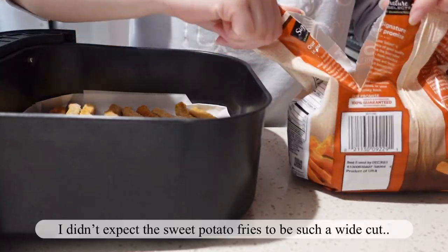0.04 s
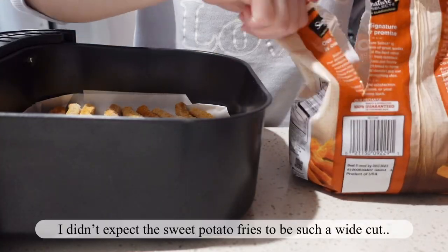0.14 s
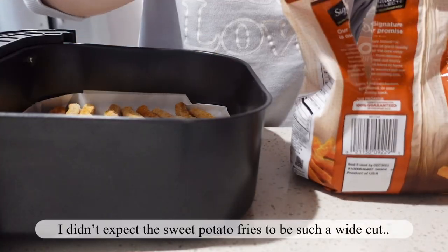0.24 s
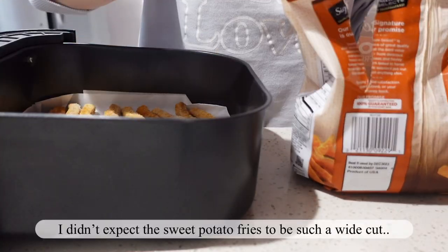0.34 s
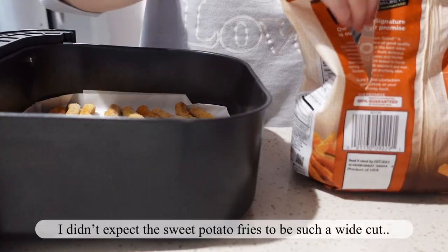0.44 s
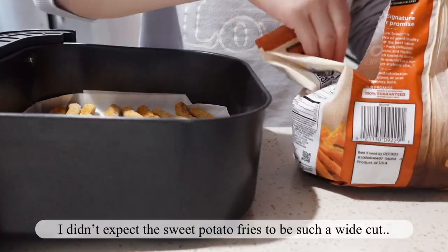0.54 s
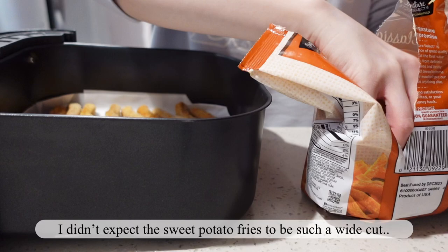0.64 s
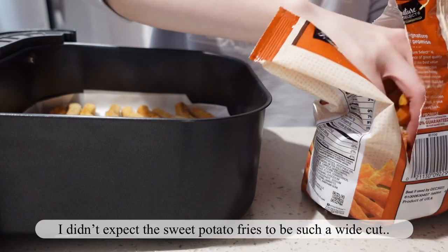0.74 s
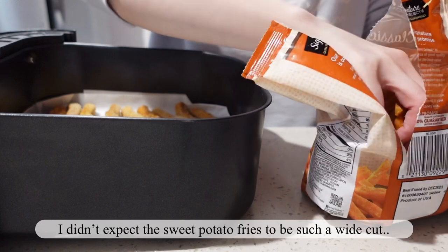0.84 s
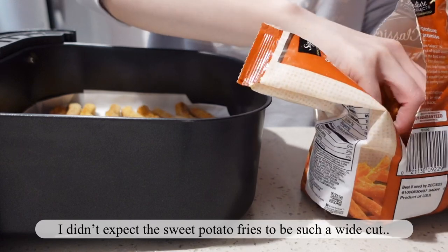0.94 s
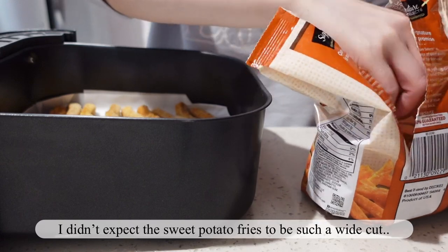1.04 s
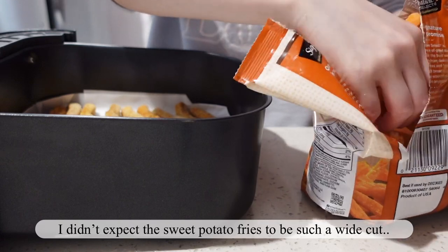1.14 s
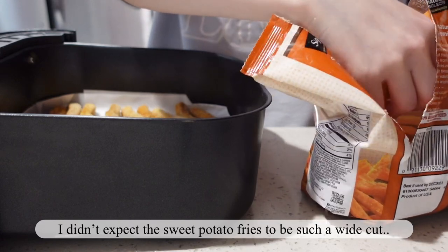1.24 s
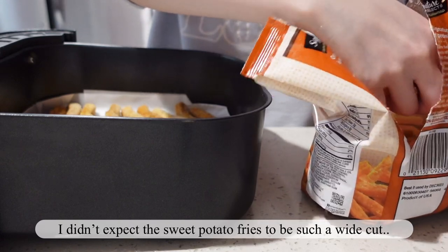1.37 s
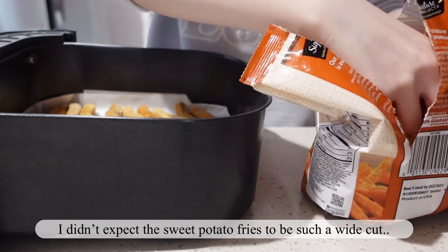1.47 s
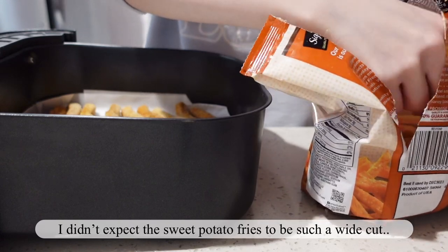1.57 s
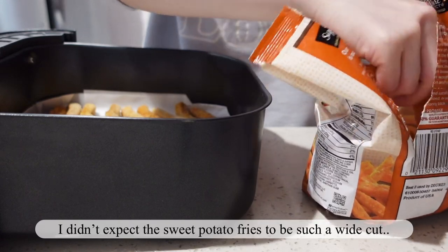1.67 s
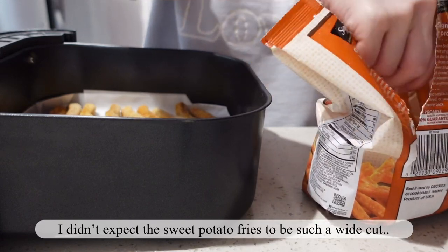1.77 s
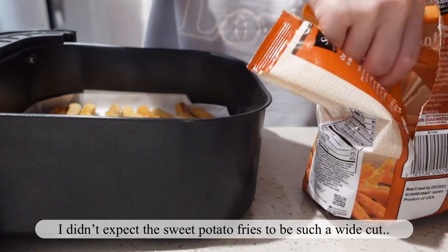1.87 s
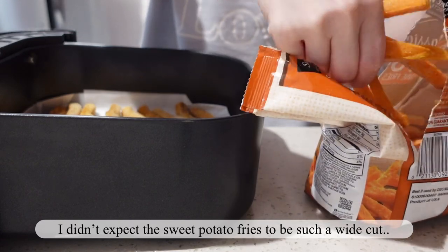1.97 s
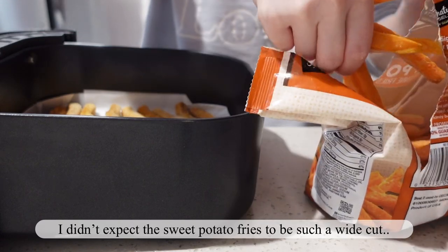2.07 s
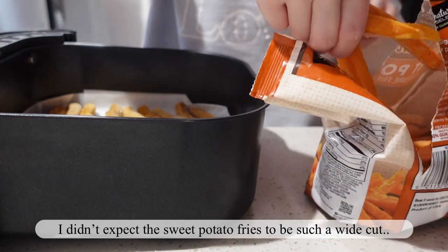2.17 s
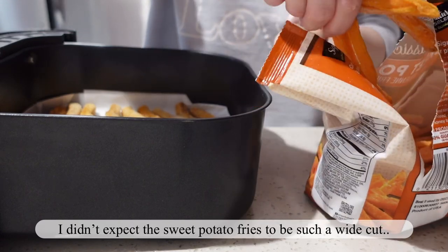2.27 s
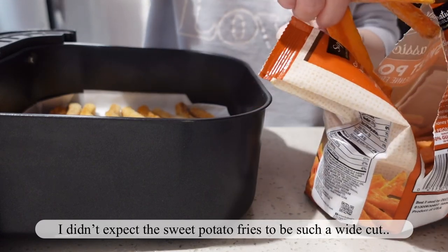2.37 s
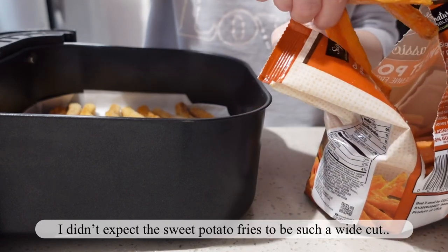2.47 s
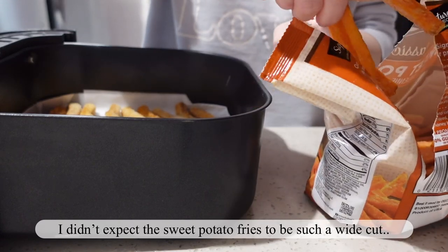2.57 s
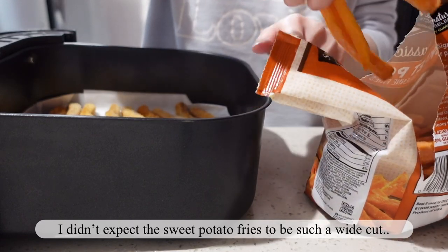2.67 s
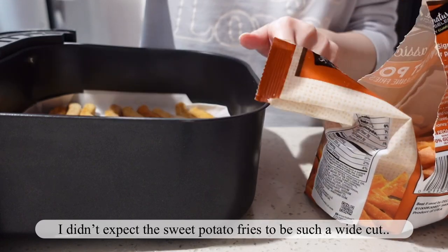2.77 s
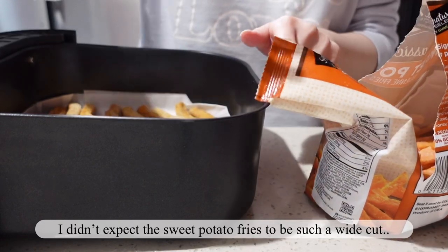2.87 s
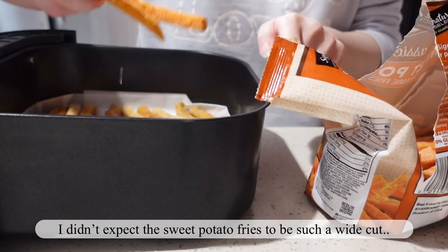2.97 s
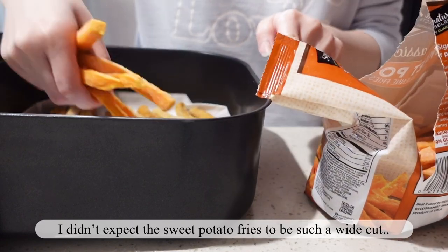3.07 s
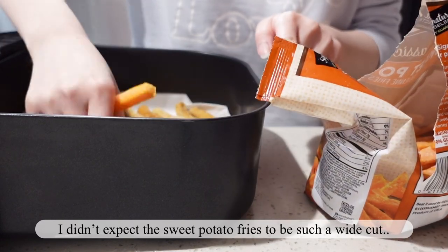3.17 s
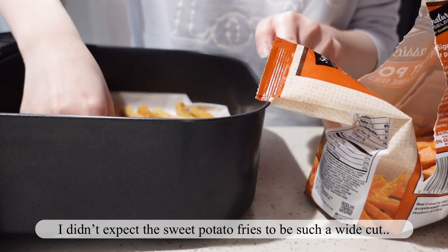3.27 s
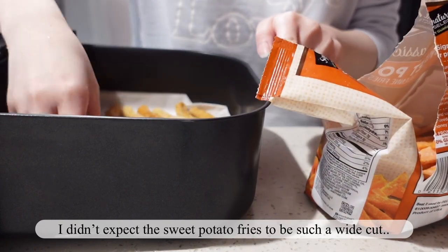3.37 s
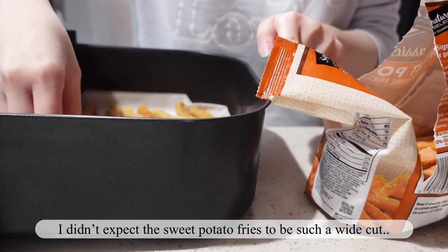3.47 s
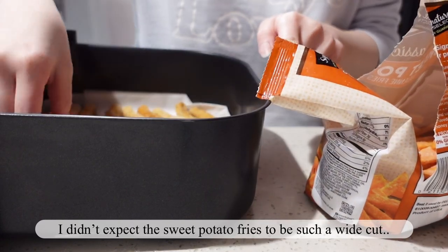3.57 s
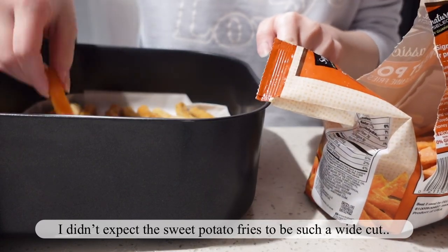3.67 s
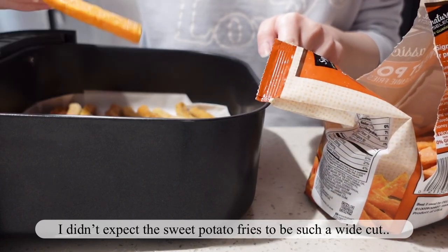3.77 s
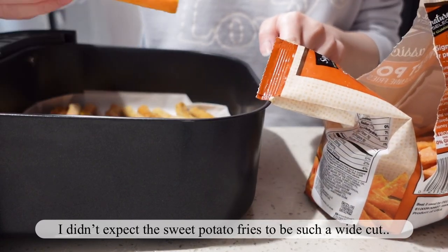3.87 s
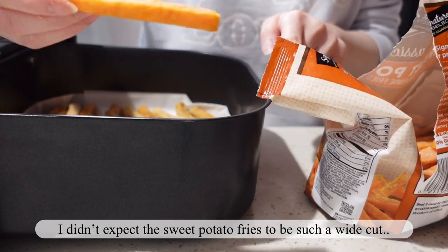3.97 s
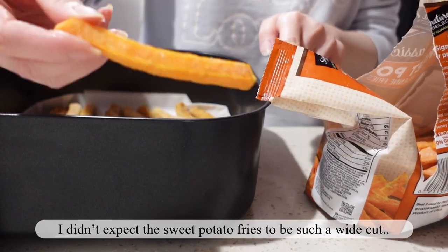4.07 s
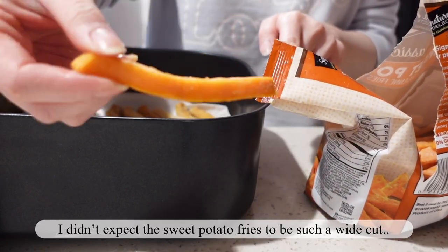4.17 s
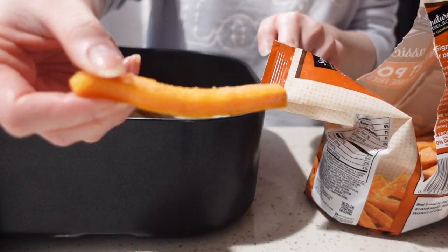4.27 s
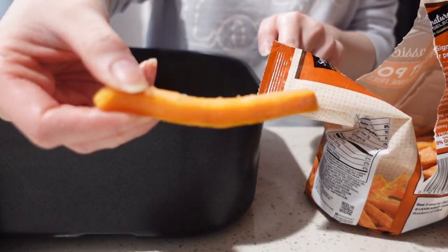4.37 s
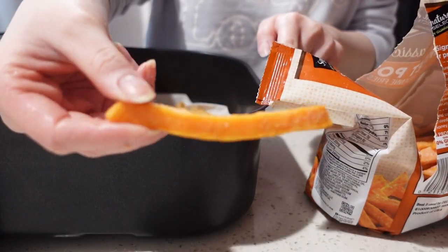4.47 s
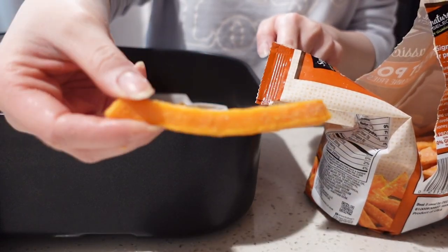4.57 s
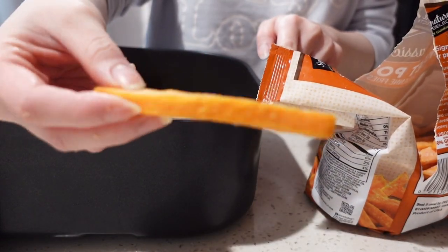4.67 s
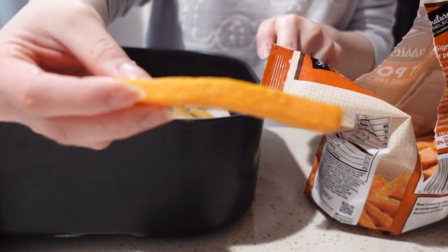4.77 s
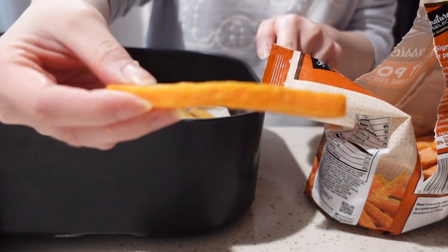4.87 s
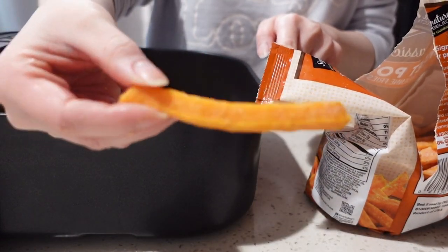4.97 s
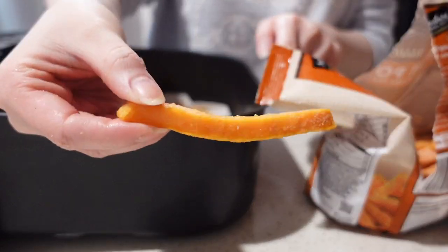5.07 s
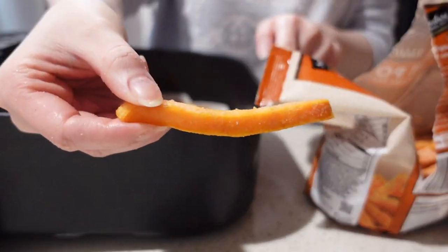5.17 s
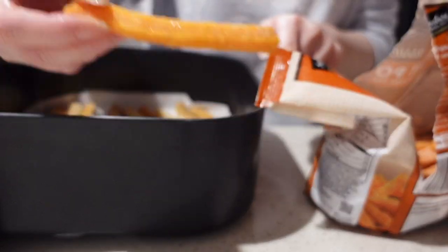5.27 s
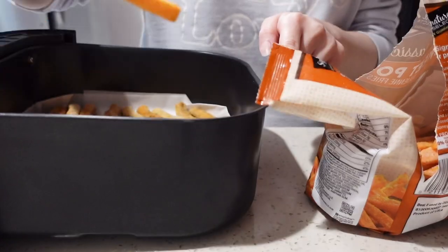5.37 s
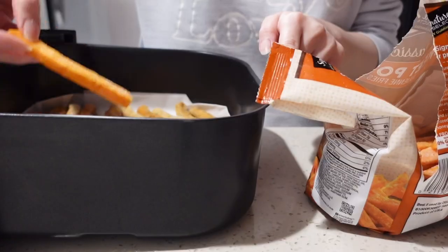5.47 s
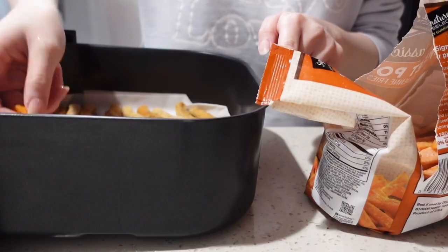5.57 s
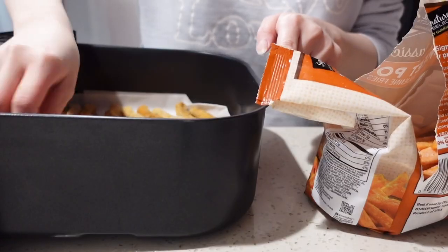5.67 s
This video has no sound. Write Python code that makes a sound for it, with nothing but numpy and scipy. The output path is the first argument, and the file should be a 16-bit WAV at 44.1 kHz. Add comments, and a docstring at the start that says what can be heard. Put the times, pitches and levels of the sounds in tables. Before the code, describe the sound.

From the start until about 2.1 seconds, a hand rummages in a stiff plastic bag close by. The plastic crackles in uneven surges with many sharp snaps, while frozen fries rub and knock dully inside and the bag bumps softly on the counter. From 2 to 2.7 seconds, fries scrape thinly along the torn edge, with a few fading ticks. Between 3 and 3.5 seconds, baking paper rustles and fries land with light, hollow knocks in a basket. Another soft touch and rustle comes at 4 seconds. It then goes quiet, apart from a few very faint, distant blips between 5 and 5.5 seconds. Near 5.7 seconds, a fry lands with a crisp paper crack and a brief hollow knock. The kitchen sounds small and hard, with very short reverberation and a low, steady hiss throughout.

```python
"""Frozen fries, bag to basket.

A hand digs in a stiff plastic bag on a kitchen counter: creases buckle and snap, fries knock together,
the bag bumps. Fries scrape out along the torn edge, then land on baking paper in a hollow basket.
A small hard room answers. Faint far-off blips near the end; low hiss throughout."""
import sys
import numpy as np
from scipy import signal
from scipy.fft import rfft, irfft, next_fast_len
from scipy.io import wavfile

SR = 44100
rng = np.random.default_rng(int(sys.argv[2]) if len(sys.argv) > 2 else 0)


def output_pcm(signal):
    """Save a mono or channel-first signal as 16-bit PCM at the path in sys.argv[1].

    Samples are clipped to [-1, 1] before scaling.
    """
    pcm = np.clip(np.atleast_2d(signal).T, -1, 1) * 32767
    wavfile.write(sys.argv[1], SR, np.round(pcm).astype(np.int16))


N = 252693

# Hand rummaging in the bag: (time [s], film crackle [dB], tumbling fries [dB])
RUMMAGE_LEVELS = [(0.0, -27.5, -28.5), (0.05, -46.5, -41.5), (0.14, -38, -37.5), (0.31, -48, -55.5),
                  (0.52, -59, -47), (0.65, -45.5, -41.5), (0.71, -37.5, -38), (0.86, -41, -45),
                  (1.14, -49, -45), (1.28, -40, -40.5), (1.44, -40.5, -42), (1.67, -42.5, -46.5),
                  (1.87, -42.5, -48), (1.99, -45.5, -36.5), (2.12, -57, -57.5), (2.59, -62.5, -65.5),
                  (2.76, -62, -70.5), (2.9, -87, -79)]
# Film crackle spectrum: (frequency [Hz], density [dB])
FILM_SPECTRUM = [(1500, -25), (2700, -5), (4500, 0), (7000, -2), (11000, -3), (15300, -6), (16500, -25)]
# Resonances of the heap of fries: (frequency [Hz], width [Hz], gain [dB])
HEAP_MODES = [(208, 30, -2.5), (299.3, 67, 2.5), (599.5, 300, -9), (1060, 39, 2.5)]
# Hiss spectrum: (frequency [Hz], density [dB])
HISS_SPECTRUM = [(24, -84.5), (40, -39), (228, -9.5), (265, -8), (377, -3), (865, -7.5), (1060, -8.5),
                 (1260, -6), (1800, -9.5), (2250, -10), (14500, -23), (16500, -29.5)]
# Room decay: (frequency [Hz], T60 [s])
ROOM_DECAY = [(200, 0.16), (1000, 0.13), (4000, 0.1), (14000, 0.053)]
# Loudest creases buckling: (time [s], level [dB], ring [Hz], relative body [dB], relative treble [dB])
FILM_SNAPS = [(0.0153, -4.5, 4500, -13.5, -16.5), (0.027, -3, 4400, -23, -18.5),
              (0.0353, -6.5, 5510, -17, -7.5), (0.0544, -7, 6760, -22, -17),
              (0.067, -15.5, 7100, -17, -6.5), (0.0825, 2, 8240, -27.5, -14.5),
              (0.0877, -12, 8100, -24, -9), (0.0953, -12.5, 3300, -29, -7), (0.1362, -6, 5560, -27, -16),
              (0.1433, -24, 7900, -17, -5), (0.1486, 3, 4900, -28, -13), (0.1642, -1.5, 5880, -15, -11),
              (0.2064, -14.5, 4100, -9, -26), (0.2326, -12.5, 4560, -13, -20), (0.2411, -8, 5550, -17, -18),
              (0.2471, -7, 2800, -9.5, -14.5), (0.3011, -5.5, 5740, -21, -13),
              (0.3168, -5, 3660, -14.5, -11.5), (0.3531, -16.5, 2940, -16, -23),
              (0.4568, -20, 8350, -23, -13), (0.4648, -27, 5940, -12, -3.5),
              (0.4776, -5.5, 5800, -29, -8.5), (0.4913, -10.5, 8200, -29.5, -10),
              (0.4972, 3.5, 5360, -21, -18), (0.5138, -6.5, 5700, -18.5, -12),
              (0.5321, 5, 7230, -18.5, -15.5), (0.5454, -8.5, 5300, -14.5, -5.5),
              (0.5561, -5.5, 5800, -19.5, -11.5), (0.56, -5.5, 5030, -19, -11),
              (0.5728, -9, 4900, -19, -10), (0.5782, -1.5, 4290, -14, -16.5),
              (0.5922, -5, 3870, -16.5, -14.5), (0.6207, -8, 6940, -19, -19.5),
              (0.624, -5.5, 6200, -18.5, -11.5), (0.6279, -2.5, 6970, -20, -15),
              (0.6461, -7, 5490, -11.5, -20.5), (0.6629, -18, 4310, -18, -15),
              (0.7368, -2, 5450, -19, -12.5), (0.7539, 2, 4280, -16.5, -10.5), (0.76, -3, 6190, -19, -14.5),
              (0.8097, -14, 3560, -8.5, -23), (0.8232, -9, 4300, -18.5, -21),
              (0.8394, -14, 5070, -25.5, -16), (0.8931, -13, 5460, -12, -24),
              (0.9006, -4, 5300, -11.5, -16), (0.9212, -9, 3110, -16, -30), (0.9284, -20, 3440, -10.5, -21),
              (0.9647, -25, 6140, -15.5, -14), (1.0009, -11, 4440, -21, -17.5),
              (1.036, -22.5, 4600, -21, -14), (1.0656, -13, 6020, -12, -21), (1.0938, -6.5, 5450, -23, -17),
              (1.0984, -17, 4760, -10, -5.5), (1.1243, 1.5, 7060, -16, -20.5),
              (1.1461, -11, 4220, -12.5, -25), (1.2136, -10, 4100, -24, -16.5),
              (1.2394, -9.5, 6400, -16.5, -18), (1.2534, -12.5, 3640, -10.5, -20),
              (1.263, -22, 7070, -17, -10.5), (1.286, -10.5, 6400, -14, -14),
              (1.302, -19.5, 5690, -9, -0.5), (1.3231, 0.5, 5730, -20.5, -9.5), (1.3979, 1, 4410, -29, -15),
              (1.405, -3.5, 6100, -17.5, -12), (1.4124, -3, 4480, -22.5, -19), (1.422, 2, 5700, -20.5, -19),
              (1.4441, -7, 3300, -18, -12.5), (1.4663, -2, 5800, -16.5, -10),
              (1.4857, -19.5, 4500, -7, -6.5), (1.491, -8.5, 4400, -16.5, -5.5),
              (1.5764, 0.5, 5280, -51.5, -16.5), (1.602, -11.5, 6450, -12, -7.5),
              (1.6114, -1.5, 4620, -27, -13.5), (1.6169, -6.5, 7630, -17.5, -8.5),
              (1.6248, -7.5, 4170, -17, -16), (1.6394, -10.5, 8300, -17.5, -13.5),
              (1.6649, -14.5, 4100, -11, -19), (1.724, -11.5, 4200, -12, -13.5),
              (1.7823, -23.5, 4370, -7, -17), (1.8087, -17.5, 3770, -14, -26),
              (1.8149, -18.5, 4170, -11, -19), (1.8632, -9, 2850, -14.5, -13),
              (1.869, -6.5, 7000, -15.5, -8), (1.923, -14, 3040, -29, -7), (1.9372, -9, 4200, -15, -20),
              (1.9467, -22, 4390, -14, -10), (1.9538, -12, 7360, -27, -11.5),
              (1.9731, -0.5, 2900, -10.5, -24.5), (1.9884, -24, 2790, -9, -22),
              (2.0346, -14, 4400, -16, -13.5), (2.0458, -15.5, 4370, -14, -16),
              (2.0861, -13.5, 4700, -24, -22), (2.114, -20, 4320, -21, -17),
              (2.123, -19.5, 4520, -16.5, -12), (2.2268, -28, 8450, -48, -4.5),
              (2.3167, -29, 4530, -37, -7), (2.3299, -24.5, 4570, -18, -6.5),
              (2.418, -28.5, 7620, -42, -8.5), (2.5321, -22, 3840, -22, -13),
              (2.6392, -27, 4590, -38, -8.5), (2.7287, -47, 4520, -21, -14)]
# Fries colliding in the bag: (time [s], level [dB], pitch [Hz])
FRY_KNOCKS = [(0.017, -28.5, 497), (0.036, -29, 764), (0.067, -26, 670), (0.087, -33.5, 345),
              (0.205, -32, 748), (0.242, -23, 834), (0.315, -28.5, 876), (0.477, -28.5, 700),
              (0.531, -13.5, 646), (0.556, -22.5, 674), (0.641, -17.5, 580), (0.68, -28, 331),
              (0.714, -23.5, 720), (0.737, -29.5, 336), (0.759, -30.5, 686), (0.809, -25, 630),
              (0.877, -31, 860), (0.901, -27, 660), (0.924, -25, 460), (1.066, -21.5, 280),
              (1.079, -24.5, 310), (1.123, -13, 673), (1.157, -24, 880), (1.211, -27.5, 463),
              (1.249, -27, 890), (1.286, -30, 516), (1.304, -32, 630), (1.408, -22.5, 580),
              (1.443, -32, 595), (1.465, -20, 627), (1.487, -26, 650), (1.612, -21.5, 624),
              (1.625, -26, 323), (1.721, -28, 373), (1.78, -34, 888), (1.864, -35, 680), (1.924, -38, 620),
              (1.953, -48, 686), (1.971, -17.5, 884), (2.034, -26, 328), (2.333, -38, 503),
              (2.534, -33, 249), (2.673, -39.5, 590)]
# Fries scraping along the torn edge: (peak time [s], level [dB])
EDGE_SCRAPES = [(2.06, -45), (2.088, -44.5), (2.122, -49), (2.225, -60), (2.3, -57), (2.328, -59),
                (2.44, -63), (2.525, -57)]
# Resonances of the taut edge: (frequency [Hz], width [Hz], gain [dB])
EDGE_MODES = [(4446, 130, 1), (5070, 170, -4), (6400, 200, -9)]
# Paper rustling under the hand: (peak time [s], level [dB])
PAPER_RUSTLES = [(3.05, -68.5), (3.215, -40), (3.39, -47.5), (4.045, -50), (5.7, -48.5)]
# Touches on the paper: (time [s], level [dB], ring [Hz], relative body [dB], relative treble [dB])
PAPER_TOUCHES = [(3.035, -26.5, 5340, -43, -13), (3.1544, -34, 3670, -19, -13.5),
                 (3.1764, -27, 3390, -18, -24), (3.196, -20, 3800, -36, -22),
                 (3.2087, -9.5, 6520, -27, -12), (3.2269, -14, 5350, -17, -18),
                 (3.2407, -7, 5240, -22, -13.5), (3.289, -24, 5130, -27, -15),
                 (3.3237, -25.5, 8000, -27, -17), (3.3722, -11.5, 7860, -25, -16.5),
                 (3.3808, -19, 3620, -21, -19), (3.392, -18, 3510, -16, -13), (3.4196, -14, 3740, -22, -17),
                 (3.4482, -40, 3420, -24, -12), (4.0025, -22.5, 5250, -20, -18),
                 (4.007, -21, 3750, -23, -15), (4.0121, -23, 3340, -16, -20),
                 (4.0348, -14.5, 4120, -24, -22), (4.0487, -20, 4240, -27, -24),
                 (4.0614, -39, 4445, -4, -21), (5.6223, -24.5, 4670, -23.5, -20),
                 (5.679, -2, 4650, -24.5, -7.5)]
# Fries landing or settling on the basket floor: (time [s], level [dB], pitch [Hz])
FRY_LANDINGS = [(3.176, -54, 735), (3.209, -45, 740), (3.229, -41, 790), (3.241, -31.5, 710),
                (3.264, -40, 416), (3.374, -36.5, 495), (3.392, -37.5, 402), (3.418, -45, 617),
                (4.007, -42.5, 433), (4.034, -49, 770), (4.048, -39, 200), (5.62, -42.5, 732),
                (5.676, -27, 700)]
# Resonances of the hollow basket: (frequency [Hz], width [Hz], gain [dB])
BASKET_MODES = [(189, 47, 1.5), (463, 19, 15), (655, 47, 2.5), (1088, 30, 8.5), (2920, 71, 11)]
# Far-off blips: (time [s], level [dB], pitch [Hz], half-width [s])
FAR_BLIPS = [(5.048, -56, 1190, 0.024), (5.365, -57.5, 1110, 0.021), (5.44, -63, 1320, 0.039),
             (5.14, -69.5, 1550, 0.07)]


def amp(db):
    """Decibels to gain."""
    return 10 ** (np.asarray(db) / 20)


def unit(x):
    """Scale to rms 1."""
    return x / np.sqrt(np.mean(x ** 2) + 1e-20)


def along(points, hz):
    """Interpolate (Hz, value) points on a log axis."""
    point_hz, values = np.transpose(points)
    return np.interp(np.log(hz + 1), np.log(point_hz + 1), values)


def filtered(x, response):
    """Apply a complex frequency response."""
    size = next_fast_len(N + SR // 2)
    return irfft(rfft(x, size) * response(np.fft.rfftfreq(size, 1 / SR)), size)[..., :N]


def shaped(x, spectrum):
    """Apply a (Hz, dB) curve."""
    return filtered(x, lambda hz: amp(along(spectrum, hz)))


def band(x, lo_hz, hi_hz):
    """Band-pass; white noise keeps its rms."""
    sos = signal.butter(2, [lo_hz, hi_hz], "bandpass", fs=SR, output="sos")
    return signal.sosfilt(sos, x) * np.sqrt(SR / 2 / (hi_hz - lo_hz))


def resonant(x, modes):
    """Parallel resonances of alternating sign."""
    return filtered(x, lambda hz: sum(
        (-1) ** k * amp(db) * 1j * hz * width_hz / (mode_hz ** 2 - hz ** 2 + 1j * hz * width_hz)
        for k, (mode_hz, width_hz, db) in enumerate(modes)))


def sides(pan_db):
    """Stereo gains, left over right by pan_db."""
    return amp(np.array([[.5], [-.5]]) * pan_db)


def stereo(mid, side):
    """Mid and side to left and right."""
    return np.array([mid + side, mid - side])


def swells(peaks, rise_db_per_s, fall_db_per_s):
    """Gain ramping up to and down from each (s, dB) peak."""
    t = np.arange(N) / SR
    return sum(amp(db - np.where(t < s, rise_db_per_s * (s - t), fall_db_per_s * (t - s)))
               for s, db in peaks)


def ticks(rate_hz, spread_db, t60_s):
    """Random noise bursts of very uneven size, rms 1."""
    when, size = rng.random((2, int(rate_hz * N / SR)))
    train = np.bincount((when * N).astype(int), amp(-spread_db * np.log(size + 0.0037)), N)
    tail = amp(-60 * np.arange(SR // 20) / SR / t60_s)
    return unit(signal.fftconvolve(train, tail)[:N] * rng.standard_normal(N))


def textures():
    """Crackle of tiny creases and rubbing of fries, each as (mid, side)."""
    creases = np.array([ticks(2000, 2.2, 0.004), 0.4 * ticks(2000, 2.2, 0.004)])
    rubs = np.array([ticks(230, 3.7, 0.033), 0.11 * ticks(250, 3, 0.025)])
    crackle = unit(shaped(creases, FILM_SPECTRUM))
    heap = unit(resonant(rubs, HEAP_MODES))
    return crackle, unit(heap + 1.7 * unit(band(rubs, 170, 2600)))


def rummage_gains():
    """Film and fries envelopes of the moving hand."""
    s, film_db, fries_db = np.transpose(RUMMAGE_LEVELS)
    return [amp(np.interp(np.arange(N) / SR, s, db, right=-120)) for db in (film_db, fries_db)]


def rummage(crackle, rubbing):
    """Film crackles and fries rub while the hand moves."""
    film_gain, fries_gain = rummage_gains()
    return stereo(*(film_gain * crackle + fries_gain * rubbing))


def bag_bumps():
    """The bag thuds softly on the counter while the fries tumble."""
    _, fries_gain = rummage_gains()
    bumps = np.array([ticks(40, 3, 0.08), 0.45 * ticks(40, 3, 0.0803)])
    thuds = unit(filtered(bumps, lambda hz: 1 / (1 + (hz / 110) ** 4)))
    return stereo(*(amp(-11) * fries_gain * thuds))


def hiss():
    """Room tone and microphone noise, partly shared by both sides."""
    mid, side = shaped(rng.standard_normal((2, N)), HISS_SPECTRUM)
    return amp(-61) * np.array([mid + 0.77 * side, mid - 0.6 * side]) / np.std(mid)


def kitchen(x):
    """Short, mostly centred reverb; treble dies first."""
    hz, t, spectra = signal.stft(rng.standard_normal((2, SR // 2)), SR, nperseg=256)
    decay = amp(-60 * t / along(ROOM_DECAY, hz)[:, None])
    tail = signal.istft(spectra * decay, SR, nperseg=256)[1]
    tail = np.pad(tail / np.linalg.norm(tail[0]), ((0, 0), (150, 0)))  # 3.4 ms pre-delay
    mid, side = signal.fftconvolve(x[None], tail, axes=1)[:, :N]
    return stereo(mid, shaped(side, [(300, -12), (2000, -10), (10000, -14)]))


def sheet_cracks(events, rise_s, spike_db, ring_db, shiver_db, shiver_t60_s, base_t60_s,
                 pan_db, pan_scatter_db):
    """Each event: a spike, a crack ringing at its own pitch, a weaker shiver of the sheet."""
    spike_t60_s, shorter_octaves_per_db = 0.0015, 0.0535
    layers, t = np.zeros((4, 2, N + SR)), np.arange(SR // 10) / SR
    rise = 1 - np.exp(-(t / rise_s) ** 2)
    spike = amp(np.maximum(-60 * t / spike_t60_s, -200))
    shiver = rise * amp(shiver_db - 60 * t / shiver_t60_s)
    pan_share = np.array([1, 0.67, 1, 0.3])[:, None, None]  # long waves differ less between sides
    for s, db, ring_hz, body_db, treble_db in events:
        t60_s = base_t60_s / 2 ** (shorter_octaves_per_db * db)  # louder cracks die sooner
        crack = rise * (spike + amp(-spike_db - 60 * t / t60_s))
        sheet = crack + shiver
        noise = rng.standard_normal((4, len(t)))
        energy = np.sum((sheet * noise[:3]) ** 2, 1, keepdims=True)
        noise[:3] /= np.sqrt(energy / np.sum(sheet ** 2))  # the blow sets the energy
        tone = np.sin(2 * np.pi * ring_hz * t + 0.25 * np.cumsum(noise[3]))  # blurred pitch
        parts = np.array([sheet * noise[0],
                          amp(ring_db) * crack * tone,
                          amp(treble_db) * (0.26 * sheet + 0.9 * crack) * noise[1],
                          amp(body_db) * sheet * noise[2]])
        pan = sides(pan_db + pan_scatter_db * rng.standard_normal()) ** pan_share
        start = round(s * SR)
        layers[..., start:start + len(t)] += amp(db) * parts[:, None] * pan
    snap, ring, treble, body = layers[..., :N] + 1e-12
    return (amp(-6) * band(snap, 2900, 7200) + ring
            + amp(11) * band(treble, 7500, 14000) + amp(7.5) * band(body, 780, 2400))


def lesser_creases(count=90, spread_db=8.5):
    """Random extra snap rows, as strong as the hand is busy."""
    s, film_db, _ = np.transpose(RUMMAGE_LEVELS)
    when, size, pitch, body, treble = rng.random((count, 5)).T
    time_s = s[-1] * when
    level_db = np.interp(time_s, s, film_db) - spread_db * np.log(size + 0.05)
    return list(zip(time_s, level_db, 3200 * 2 ** (1.3 * pitch), -24 + 12 * body, -20 + 11 * treble))


def film_snaps():
    """Creases in the stiff film buckle with sharp cracks."""
    return sheet_cracks(list(FILM_SNAPS) + lesser_creases(), rise_s=0.0005, spike_db=9, ring_db=1,
                        shiver_db=-20.5, shiver_t60_s=0.073, base_t60_s=0.0085,
                        pan_db=-1.85, pan_scatter_db=3)


def fry_knocks(events, t60_s):
    """Frozen fries strike: dull thuds of blurred pitch."""
    out, t = np.full(N + SR, 1e-12), np.arange(SR // 8) / SR
    rise = 1 - np.exp(-t / 0.00049)
    for s, db, hz in events:
        tone = np.sin(2 * np.pi * hz * t + 0.14 * np.cumsum(rng.standard_normal(len(t))))
        out[round(s * SR):][:len(t)] += rise * amp(db - 60 * t / t60_s) * tone
    return amp(-13.5) * band(out[:N], 170, 870)


def edge_scrape():
    """Rapid slips make the taut bag edge sing and the film hiss."""
    gain = swells(EDGE_SCRAPES, rise_db_per_s=240, fall_db_per_s=480)
    slips = ticks(rate_hz=1500, spread_db=1.8, t60_s=0.005)
    singing = unit(resonant(slips, EDGE_MODES))
    film_hiss = unit(shaped(slips, FILM_SPECTRUM))
    return gain * (singing + amp(3.5) * film_hiss) * sides(-1.5)


def paper_rustle(crackle, rubbing):
    """Paper rustles as the hand works in the basket."""
    gain = swells(PAPER_RUSTLES, rise_db_per_s=400, fall_db_per_s=132)
    return stereo(*(gain * (crackle + amp(-5) * rubbing)))


def paper_touches():
    """Fries and fingers meet the paper: softer, longer cracks than the film's."""
    return sheet_cracks(PAPER_TOUCHES, rise_s=0.0012, spike_db=4.5, ring_db=1.5,
                        shiver_db=-13, shiver_t60_s=0.17, base_t60_s=0.013,
                        pan_db=1.1, pan_scatter_db=2.5)


def basket_landings(rattle_t60_s=0.1):
    """Each landing knocks and jolts the hollow basket, which booms briefly."""
    jolts, t = np.zeros(N + SR), np.arange(SR // 10) / SR
    for s, db, _ in FRY_LANDINGS:
        rattle = rng.standard_normal(len(t)) * amp(-60 * t / rattle_t60_s)
        jolts[round(s * SR):][:len(t)] += amp(db) * rattle / np.linalg.norm(rattle)
    boom = resonant(jolts[:N], BASKET_MODES)
    return amp(31) * boom + amp(-5) * fry_knocks(FRY_LANDINGS, t60_s=0.082)


def far_blips():
    """Soft puffs of narrow-band noise."""
    t, out = np.arange(N) / SR, np.zeros(N)
    for s, db, hz, half_width_s in FAR_BLIPS:
        shape = np.exp(-np.minimum(((t - s) / half_width_s) ** 2, 50))
        puff = shape * band(rng.standard_normal(N), 0.85 * hz, 1.15 * hz)
        out += amp(db) * puff * np.sqrt(np.sum(shape ** 2) / np.sum(puff ** 2))
    return out


def scene():
    """Near sources, their reverb, far blips."""
    near = film_snaps() + amp(-7.5) * paper_touches()
    near += fry_knocks(FRY_KNOCKS, t60_s=0.032) + basket_landings()
    crackle, rubbing = textures()
    near += rummage(crackle, rubbing) + paper_rustle(crackle, rubbing) + edge_scrape() + bag_bumps()
    return near + amp(-11.5) * kitchen(near.mean(0)) + far_blips()


def record(dry):
    """Peak clipping, steep bass cut, added hiss, band limit."""
    bass_cut_hz, top_hz = 165, 16000
    clipped = np.clip(dry, -0.97, 0.97)
    highpass = signal.butter(5, bass_cut_hz, "highpass", fs=SR, output="sos")
    thinned = signal.sosfilt(highpass, clipped) + amp(-25) * clipped
    return filtered(thinned + hiss(), lambda hz: 1 / np.sqrt(1 + (hz / top_hz) ** 120))


dry = scene()
out = record(dry)
output_pcm(out)
```